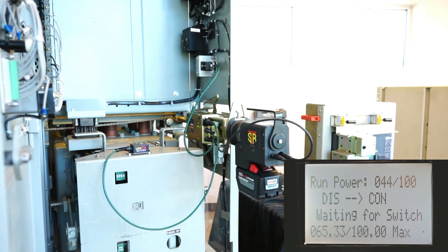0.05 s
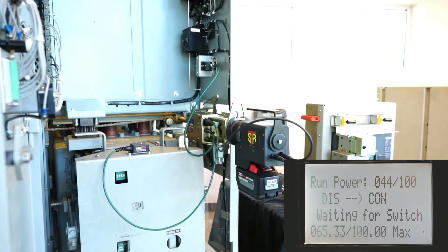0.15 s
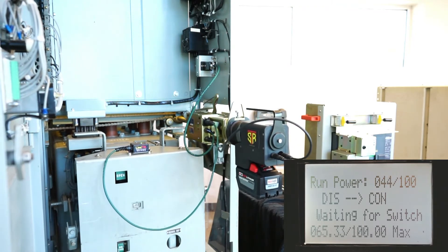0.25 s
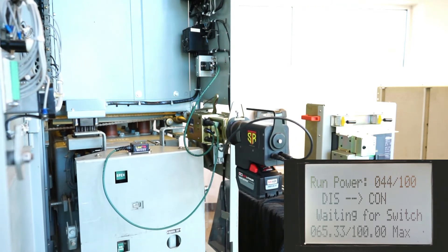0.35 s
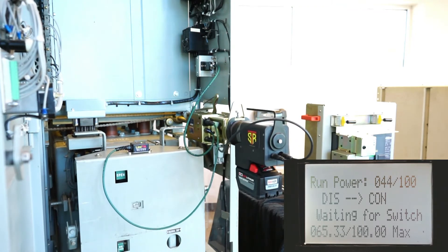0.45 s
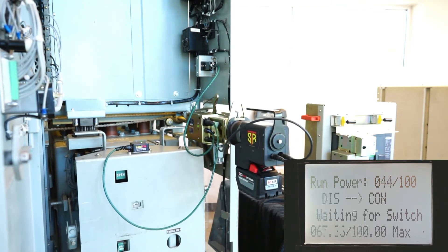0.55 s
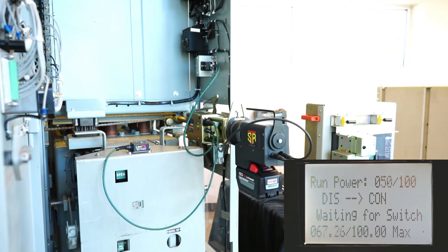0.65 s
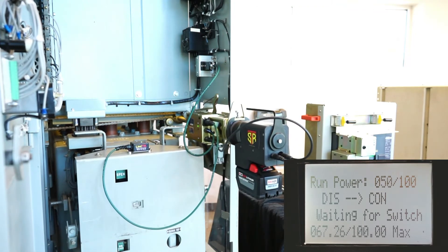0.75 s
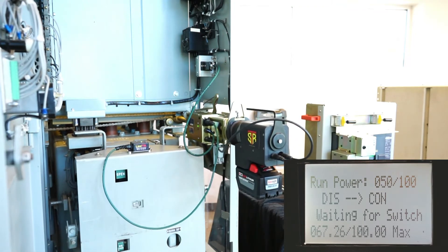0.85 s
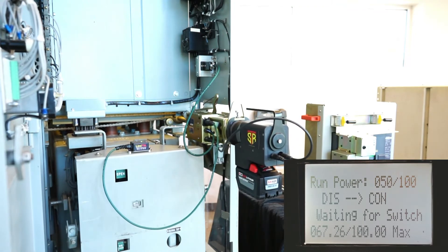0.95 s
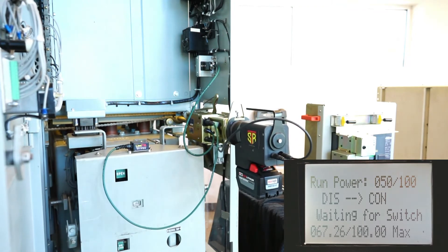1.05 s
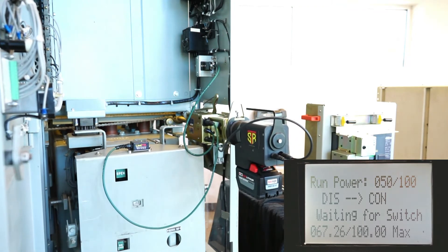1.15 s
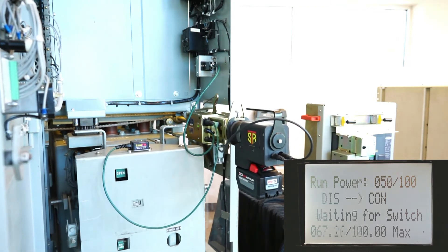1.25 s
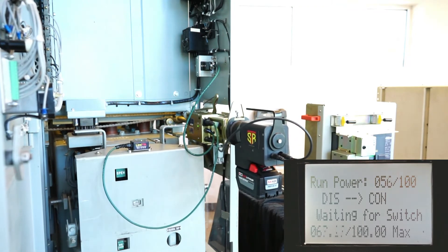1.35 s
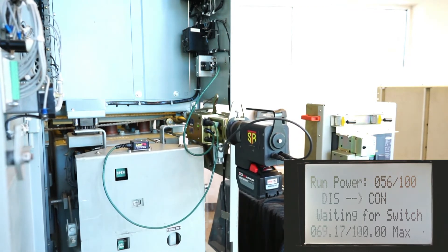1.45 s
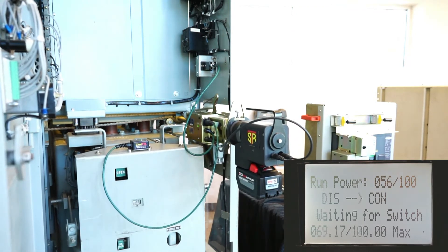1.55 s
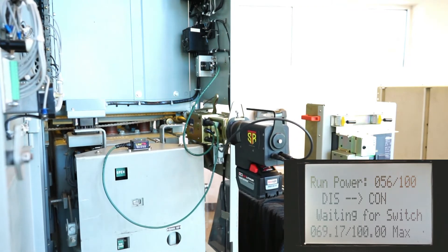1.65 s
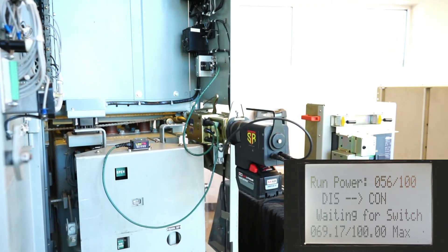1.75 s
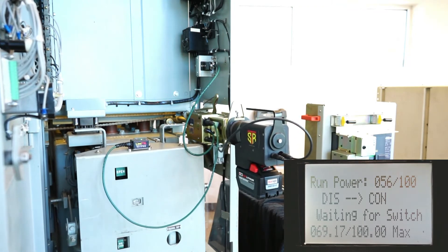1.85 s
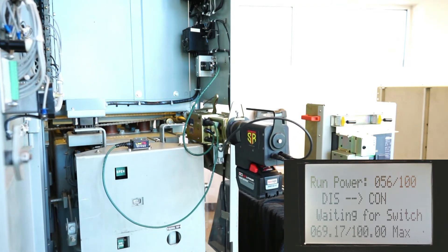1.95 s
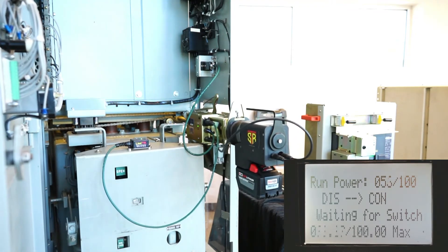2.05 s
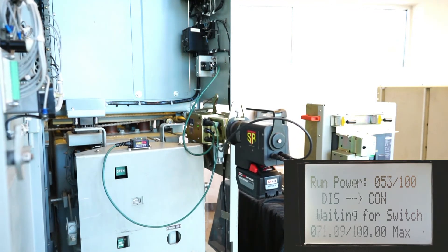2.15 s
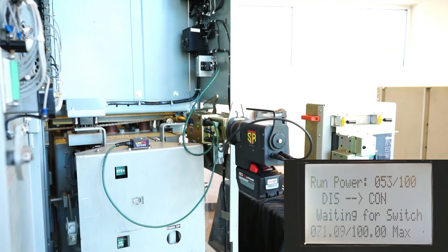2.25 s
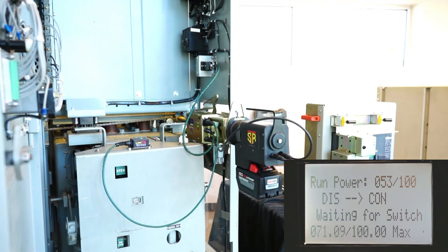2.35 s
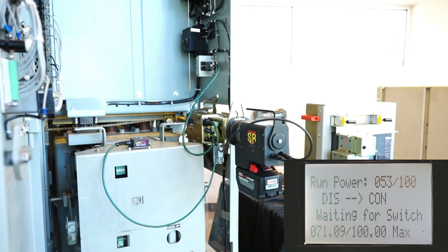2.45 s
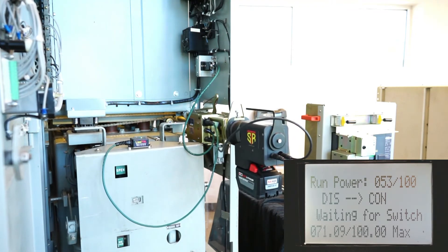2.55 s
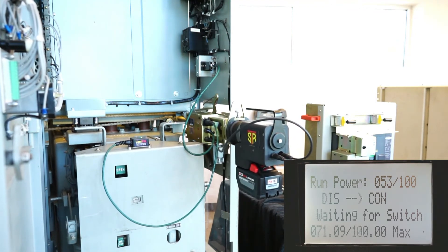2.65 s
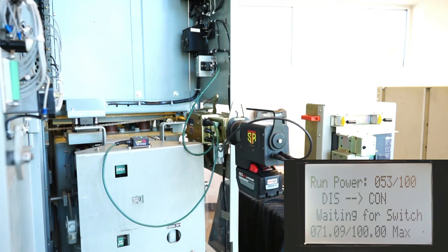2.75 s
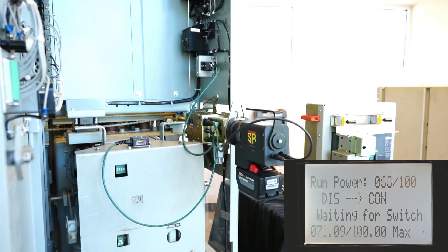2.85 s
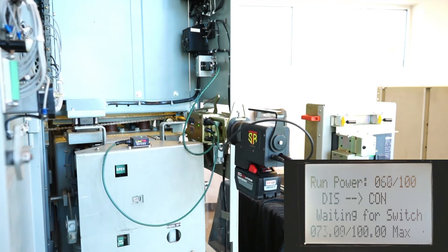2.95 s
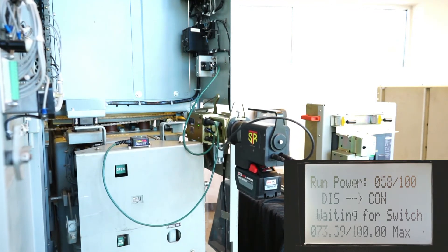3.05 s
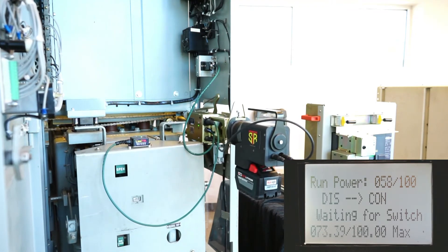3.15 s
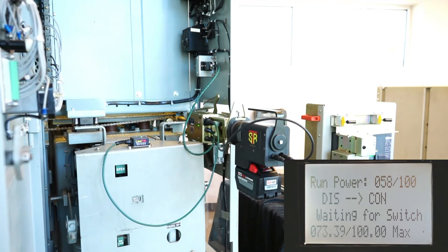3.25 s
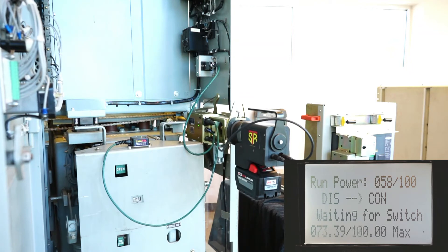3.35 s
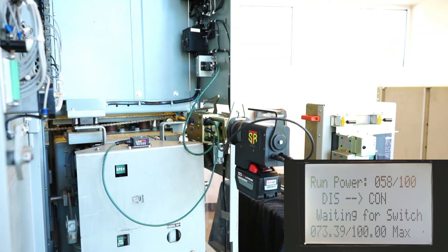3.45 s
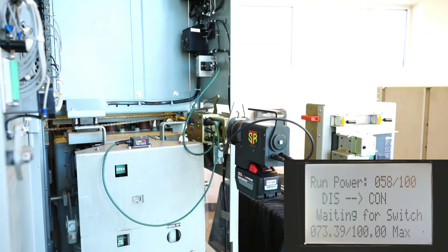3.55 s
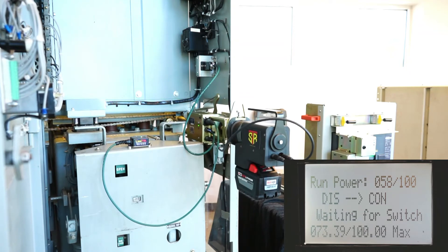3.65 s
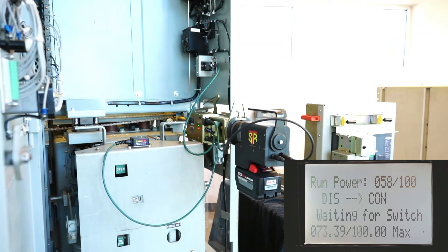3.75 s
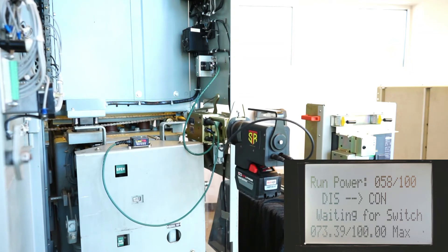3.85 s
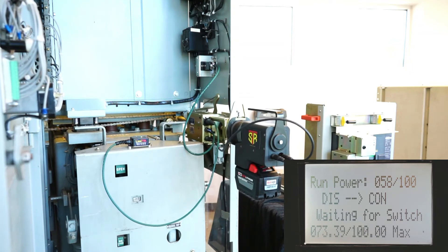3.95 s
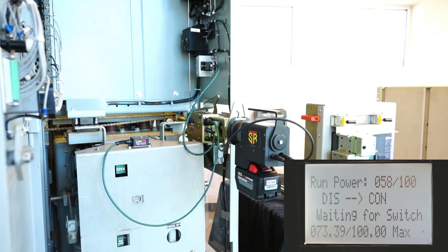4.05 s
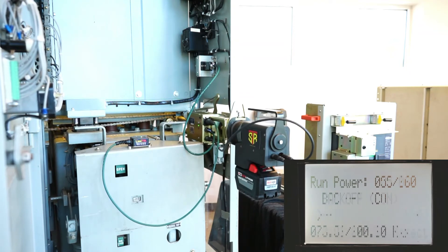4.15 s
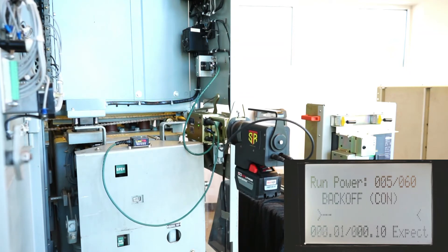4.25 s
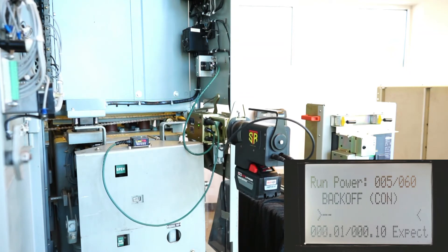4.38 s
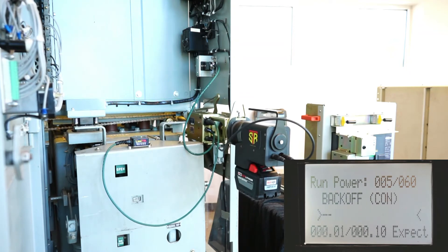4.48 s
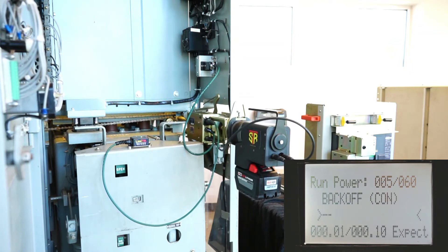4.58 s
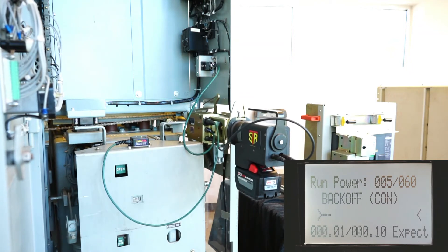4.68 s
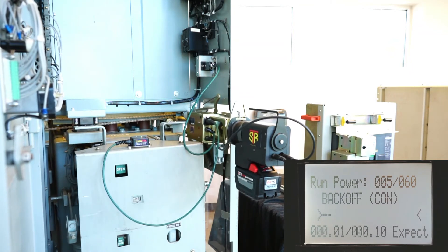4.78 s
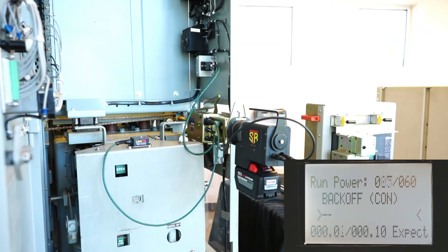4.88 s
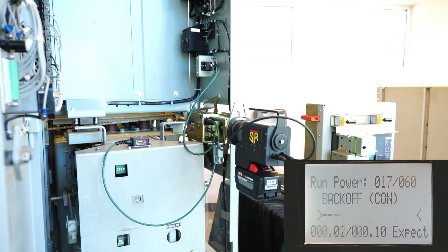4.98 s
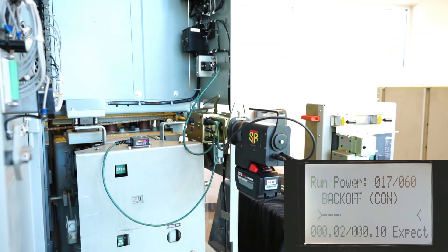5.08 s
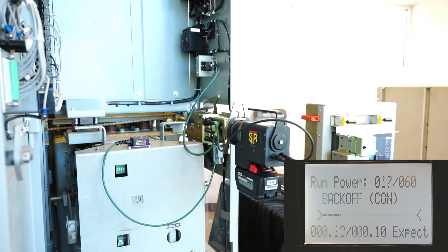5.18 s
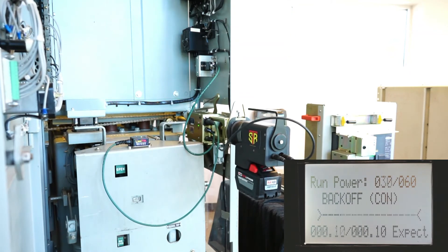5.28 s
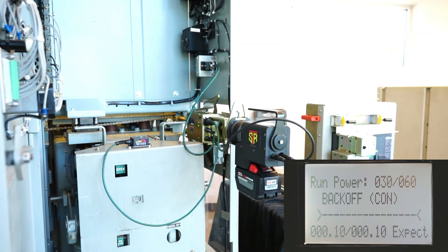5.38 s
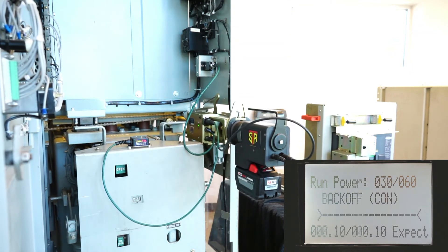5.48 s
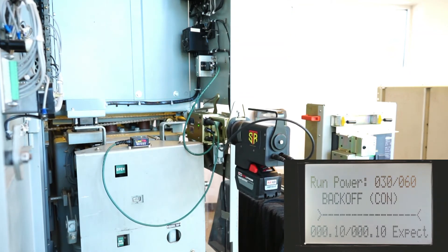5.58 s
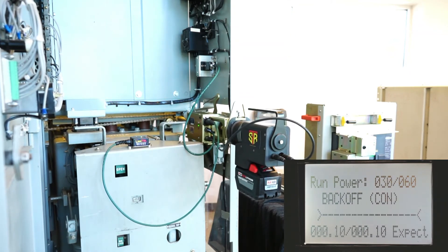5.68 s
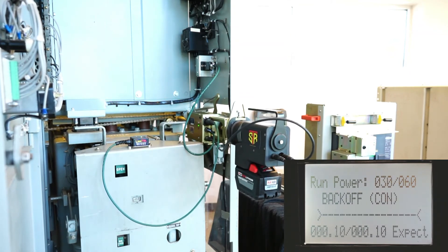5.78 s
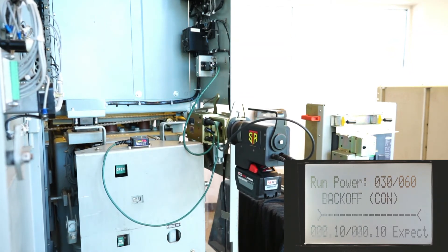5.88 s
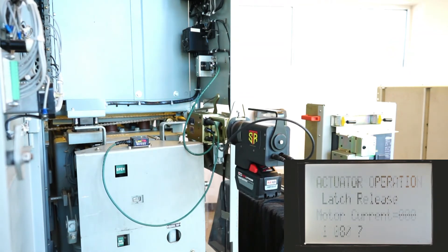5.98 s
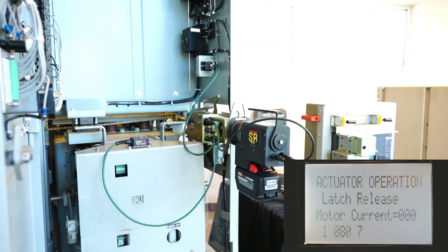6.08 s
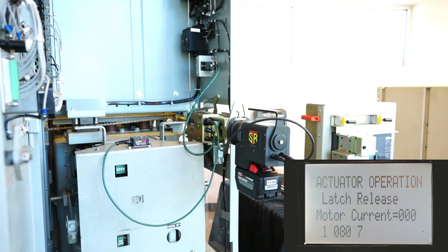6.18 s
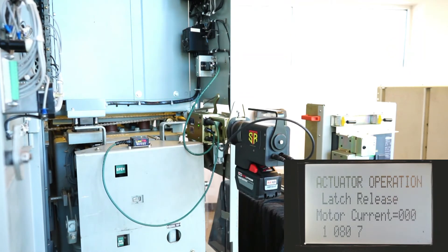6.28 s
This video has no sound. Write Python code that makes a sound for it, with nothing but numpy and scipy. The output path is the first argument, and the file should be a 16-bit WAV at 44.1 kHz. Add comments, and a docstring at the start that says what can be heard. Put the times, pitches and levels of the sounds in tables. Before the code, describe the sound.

A close motor drive whines and rattles loudly for nearly three seconds, pulsing slightly under load while metal cabinet panels drum. It cuts off with a clunk, rough scrape and high spring squeak, echoing in a hard-walled workshop. Low ventilation rumbles on. Gears knock and tick, then the motor backs off in a brief, softer chatter ending in another faint squeak.

```python
"""In a hard-walled workshop, a battery motor drive racks a breaker into its switchgear cabinet.
Rotor and gear tones whine under a wavering load, noise shaped by the gearbox rattles and panels drum.
The drive cuts off with a clunk, a noisy scrape and a small spring's squeak; the relaxing gears knock and tick.
The motor backs off briefly with a chatter of gear strikes, and the spring squeaks again.
Shaped noise makes the ventilation rumble behind, and decaying noise makes the echoes."""
import sys
import numpy as np
from scipy import signal
from scipy.fft import rfft, irfft, next_fast_len
from scipy.io import wavfile

SR = 44100
rng = np.random.default_rng(int(sys.argv[2]) if len(sys.argv) > 2 else 0)


def log_audio(samples):
    """Write samples as a 16-bit WAV file to the path given in sys.argv[1]."""
    # one column per channel
    frames = np.atleast_2d(samples).T
    # limit to full scale, then quantise
    limited = np.clip(frames, -1, 1)
    pcm = np.round(limited * 32767).astype(np.int16)
    wavfile.write(sys.argv[1], SR, pcm)


N = 278712
TIME, HZ = np.arange(N) / SR, np.fft.rfftfreq(N, 1 / SR)  # seconds, and the bins of a whole-length spectrum

# All levels are relative: the mix scales the layers again.
EFFORT_DB = -15  # shared by the drive's whine and rattle and the drumming panels
# Colour of a gear clack: pitch_hz [Hz], level_db [dB]
CLACK_COLOUR = [(100, -9), (550, -6), (880, -2.5), (1400, 0.5), (1950, -2.5), (2250, 0), (2550, -5.5),
                (3050, -1), (3500, -7), (4300, -10.5), (6500, -19.5), (9500, -31.5), (12600, -30),
                (14000, -45.5)]
# Ringing modes of the gear train: pitch_hz [Hz], level_db [dB], t60_s [s]
GEAR_MODES = [(870, -8.5, 0.059), (1800, -24, .04), (2826, -3.5, 0.054), (2920, 0, 0.042),
              (3080, -0.5, 0.051), (3230, -7, 0.044), (3400, -20, 0.023), (4380, -16, 0.015),
              (6176, -23.5, .015), (12400, -30, .006)]


def amp(db):
    """Decibels to gain."""
    return 10 ** (np.asarray(db) / 20)


def unit(x):
    """Scales to rms 1."""
    return x / np.sqrt(np.mean(x ** 2) + 1e-20)


def read(points, hz):
    """Reads a spectrum table on a log-frequency axis."""
    f, value = np.transpose(points)
    return np.interp(np.log(hz + 1), np.log(f + 1), value)


def follow(curve):
    """Reads a time curve at every sample."""
    return np.interp(TIME, *np.transpose(curve))


def drift(rate_hz):
    """Smooth random wander of rms 1; a higher rate wanders faster."""
    hz = HZ[:N // 10]
    real, imaginary = rng.standard_normal((2, len(hz)))
    spectrum = (real + 1j * imaginary) * np.exp(-(hz / rate_hz) ** 2)
    return unit(irfft(spectrum, next_fast_len(N, real=True))[:N])


def humps(resonances):
    """Gain in dB of a set of resonances at every frequency."""
    return sum(db / (1 + (2 * (HZ - hz) / width) ** 2) for hz, width, db in resonances)


def colour(x, db):
    """Minimum-phase filter with the given spectral shape, its impulse response scaled to unit energy."""
    cepstrum = irfft(np.log(amp(db) + 1e-6), N)
    # folding the cepstrum forward in time makes the filter causal
    fold = 1 + np.sign(N / 2 - np.arange(N))
    fold[0] = 1
    taps = irfft(np.exp(rfft(cepstrum * fold)), N)[:SR // 8]
    return signal.fftconvolve(x, taps[None] / np.linalg.norm(taps), axes=1)[:, :N]


def hiss():
    """Two unrelated white noises."""
    return rng.standard_normal((2, N))


def ring(x, modes, rise_s=0.0007):
    """Rings decaying modes with each signal of a pair; each ring swells in softly over a fraction of a
    millisecond."""
    t = TIME[:SR // 3]
    body = 0
    for hz, db, t60 in modes:
        phase = rng.random((2, 1))
        body = body + amp(db - 60 * t / t60) * np.sin(2 * np.pi * (hz * t + phase))
    swell = 1 - np.exp(-(t / rise_s) ** 2)
    return signal.fftconvolve(x, body * swell, axes=1)[:, :N]


def tones(turns, orders, flutter, jitter, flutter_hz):
    """Partials at multiples of a turning angle, each fluttering in size and phase, as a quadrature pair."""
    out = np.zeros((2, N))
    for multiple, db in orders:
        angle = 2 * np.pi * multiple * turns + jitter * drift(flutter_hz)
        size = amp(db) * (1 + flutter * drift(flutter_hz))
        out += size * np.array([np.cos(angle), np.sin(angle) * rng.choice([-1, 1])])
    return out


def coast(coast_s):
    """One while the power is on, then dying away."""
    cut_off_s = 2.89
    return np.exp(-np.maximum(TIME - cut_off_s, 0) / coast_s)


def burst(start_s, length_s, rise_s, fall_s):
    """Envelope that rises, holds until its length is over and dies away."""
    age = np.maximum(TIME - start_s, 0)
    return np.minimum(age / rise_s, 1) * np.exp(-np.maximum(age - length_s, 0) / fall_s)


def freedom(lead_s):
    """Plus one where the gear that binds once a turn runs freest, minus one where it drags most."""
    bind_hz, free_s = 5.17, 0.157  # turns of the gear per second, and a moment when it runs freest
    return np.cos(2 * np.pi * bind_hz * (TIME - free_s + lead_s))


def widen(pair):
    """Mid and side to left and right; a weak side in the bass keeps the low end nearly mono."""
    # Side against mid: pitch_hz [Hz], side_db [dB]
    side_width = [(120, -30), (350, -20.5), (700, -12), (1400, -8.5), (2800, -6), (5600, -3.5),
                  (12000, -4.5)]
    side = irfft(rfft(pair[1]) * amp(read(side_width, HZ)), N)
    return np.array([pair[0] + side, pair[0] - side])


def ventilation():
    """Steady low rumble with a faint hiss, made of noise shaped by one fixed spectrum."""
    # Colour of the moving air: pitch_hz [Hz], level_db [dB]
    air_colour = [(15, -44), (25, -9.5), (75, -5), (107, -7), (140, -6), (198, -10), (227, -15),
                  (305, -19.5), (331, -22), (537, -28.5), (648, -29), (871, -36.5), (970, -33), (1200, -38),
                  (15500, -58.5)]
    level_db = -37.5
    return amp(level_db) * unit(irfft(rfft(hiss()) * amp(read(air_colour, HZ)), N))


def workshop(x):
    """Diffuse echoes from a noise tail in which each band dies at its own speed."""
    # Decay of the room: pitch_hz [Hz], t60_s [s]
    room_decay = [(150, 1.52), (400, 1.7), (1000, 0.97), (2800, 0.72), (7300, 0.79), (9500, 0.56),
                  (14000, 0.54)]
    hz, t, z = signal.stft(rng.standard_normal((2, SR)), SR, nperseg=256)
    decay = amp(-60 * t / read(room_decay, hz)[:, None])
    tail = signal.istft(z * decay, SR, nperseg=256)[1]
    tail *= 1 - np.exp(-(TIME[:tail.shape[1]] / 0.0037) ** 2)  # soft onset of the echoes
    return signal.fftconvolve(x[None], tail / np.linalg.norm(tail[0]), axes=1)[:, :N]


def cabinet():
    """The racking screw shakes the sheet-metal panels, which drum on a little after the stop."""
    # Drumming panels: pitch_hz [Hz], width_hz [Hz], level_db [dB]
    panels = [(86.8, 9.6, 0), (137.1, 6.1, 2), (184.5, 10.8, -0.5), (199.5, 20, -6.5), (233, 22, -1)]
    # Booms of the loudest panel as the screw shakes it: centre_s [s], level_db [dB]
    booms = [(0.08, -27.5), (0.38, -24), (0.92, -19), (1.12, -21.5), (1.26, -28), (1.99, -26), (2.46, -30),
             (2.8, -24.5)]
    loud_panel_hz, boom_s, rest_db = 228.8, 0.067, -39.5
    response = sum(amp(db) / (1 + (2 * (HZ - hz) / width) ** 2) for hz, width, db in panels)
    drumming = amp(EFFORT_DB - 15.0) * unit(irfft(rfft(hiss()) * response, N))
    booming = amp(rest_db) + sum(amp(db) * np.exp(-((TIME - s) / boom_s) ** 2) for s, db in booms)
    loud_panel = tones(TIME, [(loud_panel_hz, 0)], flutter=0.18, jitter=0.72, flutter_hz=19) * booming
    return (drumming + loud_panel) * coast(coast_s=0.11)


def coupling():
    """The drive coupling clinks in its steel socket, one short-lived mode a clink."""
    # Clinks: start_s [s], pitch_hz [Hz], level_db [dB]
    clinks = [(2.578, 2680, -7), (2.975, 2115, -14), (4.222, 2240, -26), (4.684, 2220, -40),
              (4.776, 2140, -21)]
    t60_s = 0.042
    out = np.zeros(N)
    for s, hz, db in clinks:
        age = np.maximum(TIME - s, 0)
        out += amp(db - 60 * age / t60_s) * np.sin(2 * np.pi * hz * age)
    return np.array([out, 0.57 * out])  # a related side signal sets the clinks off centre


def brake(build_s=0.012, fade_s=0.0089):
    """The brake catches with a short scrape of noise, while a small spring builds up to a squeak."""
    # Catches of the brake: start_s [s], scrape_db [dB], spring_db [dB], length_s [s]
    catches = [(2.938, -22.5, -21, 0.041), (4.265, -60, -63, .04), (4.714, -51, -45, .018),
               (5.114, -33.5, -27.5, 0.046)]
    # Colour of the scrape: pitch_hz [Hz], level_db [dB]
    scrape_colour = [(60, -3), (200, 3), (500, -2.5), (1200, 1), (2500, -9.5), (5000, -15.5), (7500, -19.5),
                     (10300, -17), (12500, -32), (15000, -38)]
    # Tones of the spring: pitch_hz [Hz], level_db [dB]
    spring_tones = [(6960, -25), (8890, -20), (8955, -6.5), (10700, -31)]
    scrape, spring = np.zeros((2, N))
    for s, scrape_db, spring_db, length in catches:
        age = np.maximum(TIME - s, 0)
        released = np.maximum(age - length, 0)
        scrape += amp(scrape_db) * (age > 0) * np.exp(-released / 0.024)
        spring += amp(spring_db) * (1 - np.exp(-(age / build_s) ** 2)) * np.exp(-released / fade_s)
    squeak = tones(TIME, spring_tones, flutter=0.22, jitter=0.45, flutter_hz=120)
    rough_scrape = hiss() * scrape * amp(3.2 * drift(200))
    return colour(rough_scrape, read(scrape_colour, HZ)) + squeak * spring


def grind():
    """Teeth rub over one another in uneven slips as the gear train runs down and relaxes."""
    # Grinds: start_s [s], length_s [s], level_db [dB]
    grinds = [(2.894, 0.016, -19), (2.953, 0.026, -19.5), (4.167, 0.06, -46), (4.225, 0.064, -40),
              (4.685, 0.053, -41.5), (4.743, 0.036, -48)]
    slips = hiss() * amp(1.1 * drift(220))
    rubbing = sum(amp(db) * burst(s, length, rise_s=0.013, fall_s=0.012) for s, length, db in grinds)
    return unit(colour(slips, read(CLACK_COLOUR, HZ))) * rubbing


def knocks(bounce_s=.0055, rebound=0.36):
    """Each knock or tick is a short clatter in the casing, a bouncing ring of the gears and a frame thud."""
    # Dull knocks of the drive against its frame: start_s [s], clack_db [dB], thud_db [dB]
    frame_knocks = [(2.576, -24, -31), (2.959, -21, -31), (2.972, -24, -31), (3.003, -18.5, -18),
                    (4.221, -29, -46), (4.267, -36, -28), (4.684, -40, -37), (4.777, -29, -39),
                    (4.791, -32, -26.5)]
    # Bright ticks of teeth taking up their slack: start_s [s], ring_db [dB]
    slack_ticks = [(4.015, -33), (4.160, -50), (4.555, -27), (4.648, -48), (4.714, -26), (4.741, -25),
                   (4.753, -30), (4.764, -23.5), (4.817, -23), (4.846, -23)]
    # Colour of the frame thud: pitch_hz [Hz], level_db [dB]
    thud_colour = [(30, -14), (90, -3), (220, -3.5), (400, -14.5), (1000, -15.5), (4000, -75.5)]
    knock_ring_db = -19  # relative to the clack
    tick_clack_db, tick_thud_db = -4, -14  # relative to the ring
    blows = [(s, db, db + knock_ring_db, thud_db) for s, db, thud_db in frame_knocks]
    blows += [(s, db + tick_clack_db, db, db + tick_thud_db) for s, db in slack_ticks]
    clack, strike, thud = np.zeros((3, N))
    for s, clack_db, ring_db, thud_db in blows:
        start = round(s * SR)
        age = TIME[:N - start]
        clack[start:] += amp(clack_db) * np.exp(-age / 0.0096)
        thud[start:] += amp(thud_db) * np.exp(-age / 0.047)
        # the teeth rebound, each time more softly
        for k, gap in enumerate(rng.uniform(0.82, 1.3, size=3)):
            strike[start + round(k * gap * bounce_s * SR)] += amp(ring_db) * rebound ** k
    clatter = amp(-2.0) * colour(hiss() * clack, read(CLACK_COLOUR, HZ))
    gear_ring = amp(-1.5) * ring(np.array([strike, strike]), GEAR_MODES)
    frame_thud = amp(-4.5) * colour(hiss() * thud, read(thud_colour, HZ))
    return clatter + gear_ring + frame_thud


def back_off(chatter_hz=145, uneven=.4):
    """Unloaded gears chatter from tooth to tooth as the motor creeps backwards, gathering a little force."""
    start_s, stop_s = 4.853, 5.086
    start_db, climb_db_per_s = -27.5, 9.5
    teeth = np.cumsum(chatter_hz * np.maximum(1 + uneven * drift(90), .1)) / SR
    strikes = np.diff(np.floor(teeth), prepend=0) * amp(2 * drift(150))  # one impulse a tooth
    tooth_noise = hiss() * (.5 + np.exp(-(teeth % 1) / .5))
    clatter = unit(colour(tooth_noise, read(CLACK_COLOUR, HZ)))
    gear_ring = unit(ring(np.array([strikes, strikes]), GEAR_MODES))
    chatter = amp(-5.0) * clatter + amp(-5.5) * gear_ring
    effort = amp(start_db + climb_db_per_s * (TIME - start_s))
    return chatter * effort * burst(start_s, stop_s - start_s, rise_s=0.012, fall_s=0.021)


def motor():
    """Whine locked to rotor and gears, and a rattle of tooth impacts that bunches twice in each turn."""
    # Rotor pace under the slowly changing load: time_s [s], pace [turns per second]
    pace = [(0.0, 265.2), (0.45, 264.8), (0.95, 262.4), (1.5, 265.2), (1.9, 263.6), (2.42, 265.5),
            (2.7, 263.6), (2.89, 264.6)]
    # Tones locked to the rotor: multiple [of its speed], level_db [dB]
    rotor_orders = [(2, -11.5), (3, -18.5), (5, -16.5), (7, -12), (8, -6), (10, -3.5), (12, -20),
                    (14, -13.5), (16, -20.5), (28, -19.5)]
    # Whine of the meshing teeth: multiple [of the mesh rate], level_db [dB]
    mesh_orders = [(1, -7.5), (2, -14.5), (3, -13), (4, -13), (5, -15.5), (6, -24)]
    # Side tones of the circling planet gears: multiple [of the rotor speed], level_db [dB]
    planet_orders = [(5.5, -22.5), (5.744, -6.5), (5.9, -23), (8.28, -11), (8.44, -2.5), (11, -2.5)]
    # Whines that swell once a turn of the binding gear:
    # multiple [of the rotor speed], level_db [dB], swell_db [dB], lead_s [s], wander_db [dB rms]
    swelling_whines = [(4, -29.5, 5, 0.073, 2), (6, -23, 1, 0.0, 0.2)]
    # Course of those whines: time_s [s], level_db [dB]
    whine_level = [(0.0, -1), (0.7, -3.5), (1.2, -0.5), (1.55, 2.5), (1.8, 1.5), (2.4, 2.5), (2.89, -2)]
    # Gearbox and cabinet under the tooth impacts: pitch_hz [Hz], level_db [dB]
    casing = [(25, -30), (42, -8), (110, -5.5), (300, -9.5), (820, -9.5), (1300, -8.5), (1800, -6),
              (2450, -8.5), (3200, -8.5), (4600, -8), (5600, -12.5), (7500, -12), (8200, -19),
              (15000, -35.5)]
    # Gearbox resonances: pitch_hz [Hz], width_hz [Hz], gain_db [dB above the casing]
    gearbox = [(1003, 90, 4), (1532, 86, 9.5), (2166, 100, 9), (2706, 120, 7), (3002, 71, 7),
               (3050, 60, 2.5), (3284, 160, 5.5), (3850, 69, 2), (4265, 170, 3), (5060, 220, 2.5),
               (5790, 120, -2), (7380, 180, -4.5), (9050, 57, 9.5)]
    # Narrow housing rings that tones swell through as the speed wavers:
    # pitch_hz [Hz], width_hz [Hz], gain_db [dB]
    housing = [(975, 30, 0), (1513, 17, 0), (1581, 27, 3.5), (1745, 17, 2), (2083, 37, 3), (2166, 22, -6),
               (2810, 15, 0.5), (3693, 40, 4.5), (4210, 36, 7), (6010, 50, 5.5), (7322, 78, 11)]
    mesh_per_turn = 5.625
    sag, wander = 1.9, 0.8  # turns per second: the binding gear's drag, and chance
    speed = follow(pace) + sag * freedom(0) + wander * drift(7)
    turns = np.cumsum(speed * (1 + 0.0015 * drift(22))) / SR
    gear_turns = turns + .008 * drift(28)  # backlash lets the gears lag and lead the rotor
    mesh_turns = gear_turns * mesh_per_turn
    whine = amp(-4.5) * tones(turns, rotor_orders, flutter=.25, jitter=0.32, flutter_hz=11)
    whine += amp(-2.5) * tones(mesh_turns, mesh_orders, flutter=0.43, jitter=0.54, flutter_hz=25)
    whine += amp(-8.0) * tones(gear_turns, planet_orders, flutter=0.23, jitter=0.9, flutter_hz=22)
    whine *= amp(EFFORT_DB)
    for multiple, db, swell_db, lead_s, wander_db in swelling_whines:
        level_db = follow(whine_level) + swell_db * freedom(lead_s) + wander_db * drift(6)
        partial = tones(turns, [(multiple, db)], flutter=0.071, jitter=0.226, flutter_hz=28)
        whine += partial * amp(level_db)
    bunching = 1 + 0.092 * np.cos(4 * np.pi * turns)
    impacts = hiss() * amp(1.9 * drift(1850) + .6 * drift(50)) * bunching
    rattle = amp(EFFORT_DB - 2.5) * unit(colour(impacts, read(casing, HZ) + humps(gearbox)))
    return [amp(0.16) * colour(part * coast(0.01), humps(housing)) for part in (whine, rattle)]


def scene():
    """Close drive, echoes and ventilation; rattle and cabinet feed the room most strongly, whine least."""
    whine, rattle = motor()
    heavy = rattle + cabinet()
    light = knocks() + grind() + coupling() + back_off() + brake()
    room_feed = amp(-15) * whine[0] + amp(-8.5) * heavy[0] + amp(-10.5) * light[0]
    close = amp(-1) * (whine + heavy + light)
    return widen(close + workshop(room_feed) + ventilation())


def record(dry):
    """Tilts the stereo balance by frequency, rounds the highest peaks and cuts the top of the band."""
    # Stereo balance: pitch_hz [Hz], left_minus_right_db [dB]
    balance = [(200, 0.34), (1200, 0.7), (2800, -0.8), (5600, -1.2), (9500, -2.5), (14000, 0.5)]
    edge_hz = 15500
    leaning = irfft(rfft(dry) * amp(np.array([[.5], [-.5]]) * read(balance, HZ)), N)
    rounded = leaning / (1 + (leaning / .92) ** 6) ** (1 / 6)
    lowpass = signal.firwin(1023, edge_hz, window=("kaiser", 9), fs=SR)
    return signal.oaconvolve(rounded, lowpass[None], "same")


dry = scene()
out = record(dry)
log_audio(out)
```